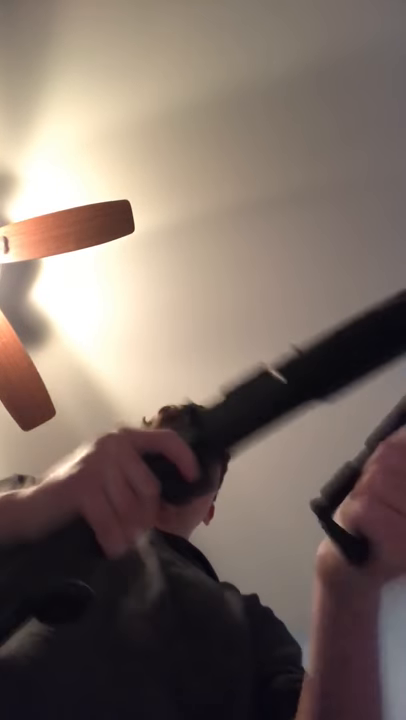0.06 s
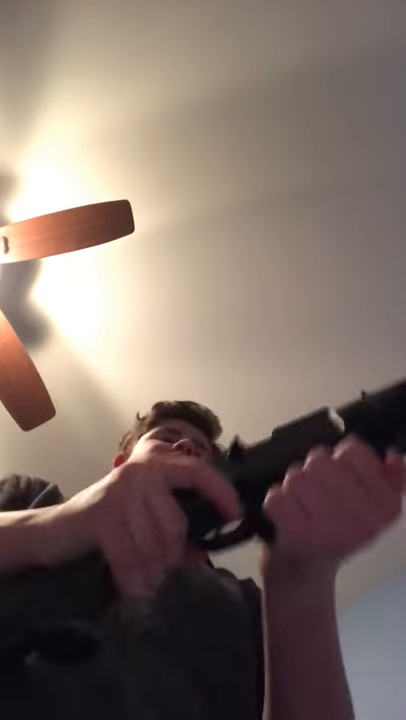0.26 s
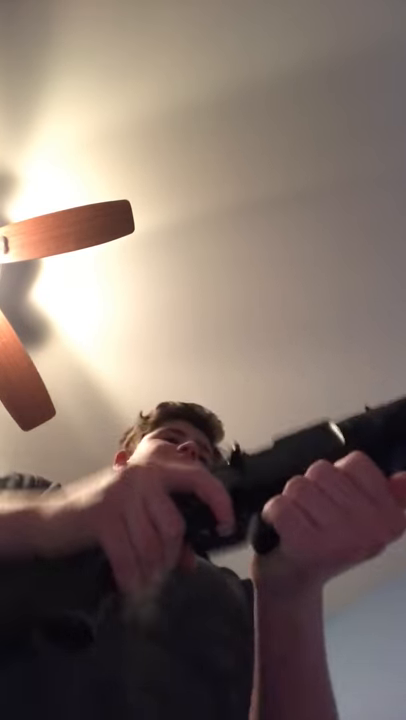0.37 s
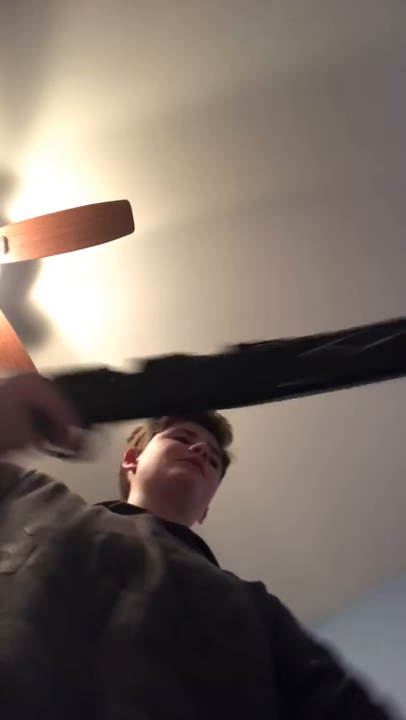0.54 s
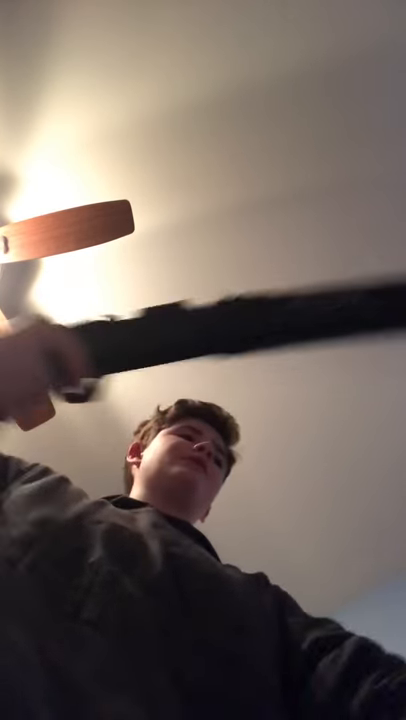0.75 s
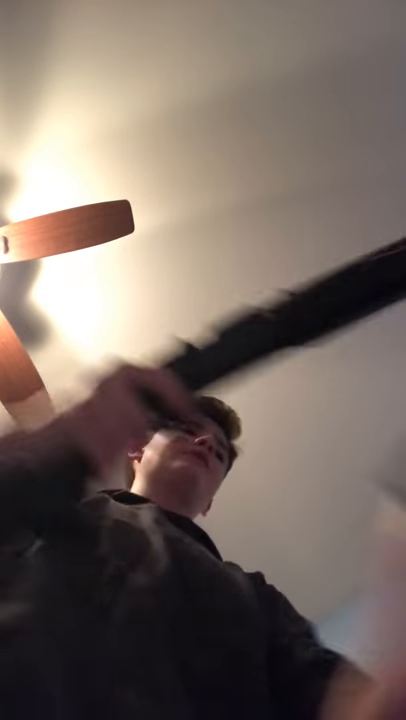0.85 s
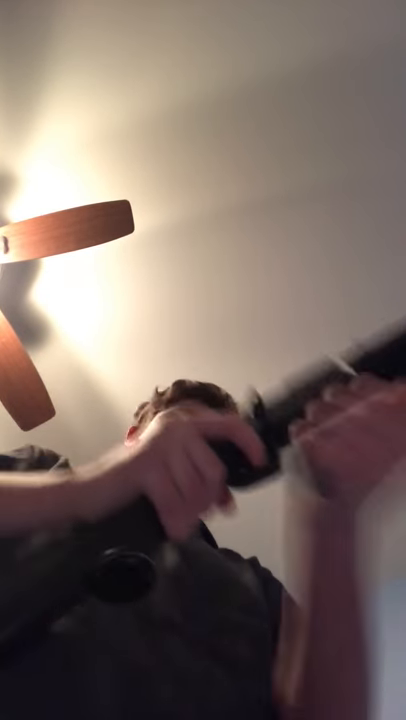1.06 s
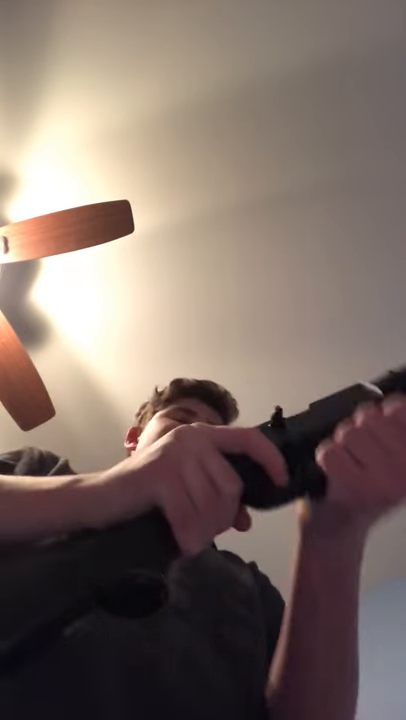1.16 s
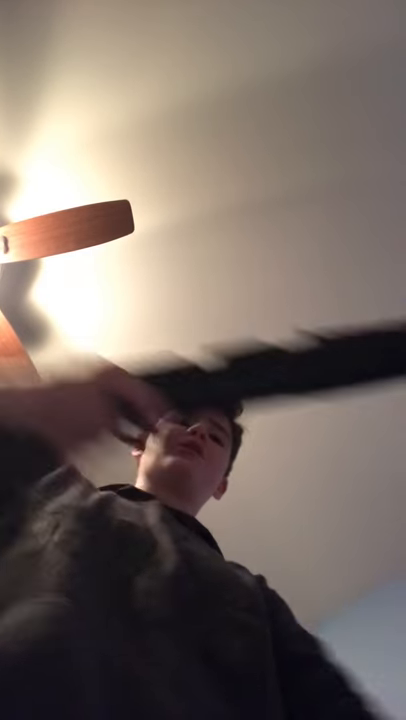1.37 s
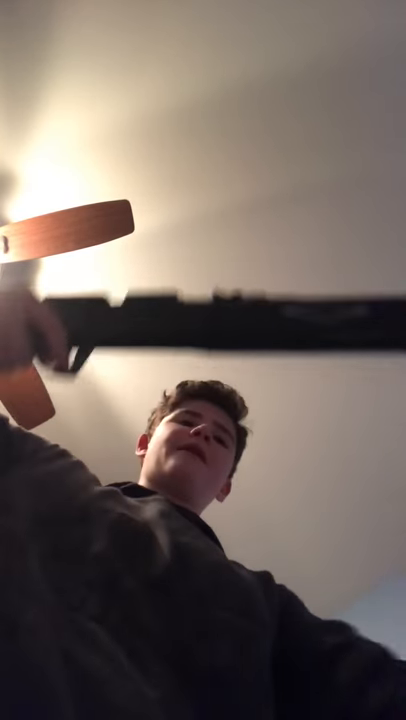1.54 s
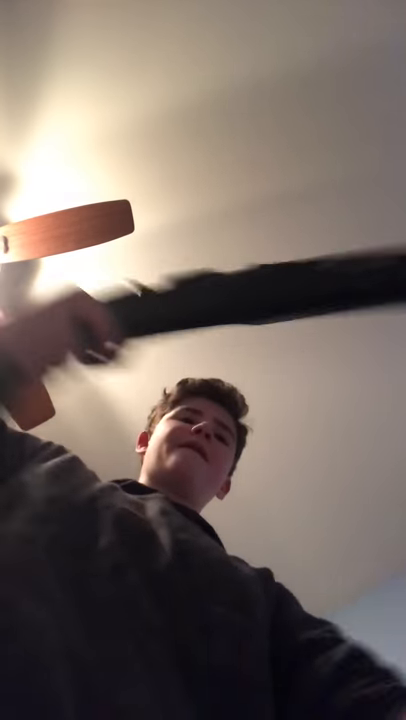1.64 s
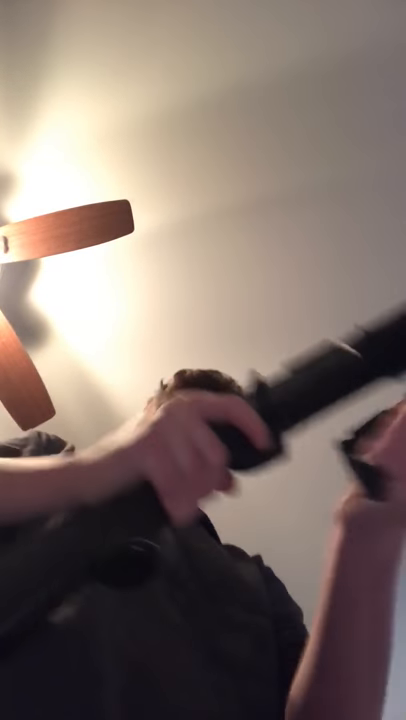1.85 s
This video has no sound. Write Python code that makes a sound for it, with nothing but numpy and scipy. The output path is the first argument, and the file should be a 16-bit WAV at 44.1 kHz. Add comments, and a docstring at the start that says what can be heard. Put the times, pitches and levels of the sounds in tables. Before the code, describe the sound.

A pump air rifle's lever slams shut with a sharp, hollow clack, then swings open with lighter clicks and rattles. The cycle happens twice, with faint piston rubbing between, close to the microphone in a small room.

```python
"""A piston rubs softly over a faint hum, then the lever of a pump air rifle slams shut: a latch crack,
a hollow thunk of the stock, a ring of the barrel. The lever unlatches, knocks over its pivot and hits
its open stop, with small rattles after; the piston rubs and squeaks as it travels. The rifle is worked
twice in a small room, close above the microphone."""
import sys
import numpy as np
from scipy import signal
from scipy.fft import rfft, irfft, next_fast_len
from scipy.io import wavfile
from scipy.ndimage import uniform_filter1d

SR = 44100
rng = np.random.default_rng(int(sys.argv[2]) if len(sys.argv) > 2 else 0)


def unload_audio(sound):
    """Save the sound as a 16-bit wav file, at the path given as the first command line argument."""
    columns = np.transpose(np.atleast_2d(sound))
    # keep every value between -1 and 1, then stretch to whole-number steps
    steps = np.round(np.clip(columns, -1, 1) * 32767)
    wavfile.write(sys.argv[1], SR, steps.astype(np.int16))


N = 83790
T = np.arange(N) / SR
SHORT = T[:N // 4]  # time axis of one impact


def amp(db):
    """Decibels to gain."""
    return 10 ** (np.asarray(db) / 20)


def fade(t, t60):
    """Falls by 60 dB in t60 seconds."""
    return np.exp(-np.log(1000) * t / np.maximum(t60, 1e-3))


def add(out, start_s, sound):
    """Mixes a sound into out."""
    i = int(np.clip(start_s * SR, 0, N - 1))
    out[i:i + len(sound)] += sound[:N - i]


def log_interp(points, hz):
    """Reads a table on a log-frequency axis."""
    point_hz, values = np.array(points).T
    return np.interp(np.log(np.maximum(hz, 1)), np.log(point_hz), values)


def colour(x, spectrum):
    """Minimum-phase filter of the given spectrum; keeps the power of white noise."""
    n = 2 * next_fast_len(len(x))
    gain = amp(log_interp(spectrum, np.arange(n // 2 + 1) * SR / n))
    cepstrum = irfft(np.log(gain / np.sqrt(np.mean(gain ** 2))), n)
    cepstrum[1:n // 2] *= 2
    cepstrum[n // 2 + 1:] = 0
    return irfft(rfft(x, n) * np.exp(rfft(cepstrum)), n)[:len(x)]


def resonate(x, hz, q):
    """One resonance, unity gain at its peak."""
    return signal.lfilter(*signal.iirpeak(hz, q, fs=SR), x)


def grains(spread_db, size=32):
    """Noise of tiny uneven contacts, size samples each; rms 1."""
    strength = np.clip(rng.standard_normal(N // size + 1), -2, 2)
    gain = amp(spread_db * np.repeat(strength, size)[:N])
    return rng.standard_normal(N) * gain / np.sqrt(np.mean(gain ** 2))


def burst(decay_s, flat):
    """A dying cluster of micro-impacts; flat (0-1) evens out its chance resonances."""
    envelope = fade(SHORT, decay_s)
    spectrum = rfft(rng.standard_normal(len(SHORT)) * envelope, 2 * next_fast_len(len(SHORT)))
    flattened = irfft(spectrum / (np.abs(spectrum) + 1e-9) ** flat)[:len(SHORT)]
    cluster = flattened * np.sqrt(envelope)
    return cluster * np.sqrt(np.sum(envelope ** 2) / np.sum(cluster ** 2))


def ring(modes_hz, modes_db, t60s, rise_s):
    """Damped modes that start up to 0.3 ms apart, pushed for about rise_s."""
    out = 0
    for k, (hz, db, t60) in enumerate(zip(modes_hz, modes_db, t60s)):
        lag_s = 0.0003 * rng.random() * min(hz / 5000, 1)
        t = np.maximum(SHORT - lag_s, 0)
        envelope = fade(t, t60) * (1 - np.exp(-t / rise_s))
        out += (-1) ** k * amp(db) * envelope * np.sin(2 * np.pi * hz * t)
    return out


def knock(modes, t60, favoured_hz=None, favour_db=3.5, favour_octaves=0.15):
    """A struck part, detuned anew each blow; the contact point lifts modes near favoured_hz. Peak 1."""
    hz, db = np.array(modes).T
    if favoured_hz is not None:
        db = db + favour_db * np.exp(-(np.log2(hz / favoured_hz) / favour_octaves) ** 2)
    detuned_hz = hz * (1 + 0.02 * rng.standard_normal(len(hz)))
    blow = ring(detuned_hz, db, np.full(len(hz), t60), rise_s=0.00089)
    return blow / np.abs(blow).max()


# Room rumble. Each row: frequency in Hz, relative density in dB.
RUMBLE_SPECTRUM = [(20, -23), (32, -19.5), (55, 0.5), (95, -7), (200, -13.5), (500, -14.5), (1300, -26.5),
                   (4000, -27), (15000, -31)]


def background(rumble_db=-59.5, hum_hz=124.4, hum_db=-65.5):
    """Steady room rumble and a faint mains hum."""
    rumble = amp(rumble_db) * colour(rng.standard_normal(N), RUMBLE_SPECTRUM)
    return rumble + amp(hum_db) * np.sqrt(2) * np.sin(2 * np.pi * hum_hz * T)


# Friction envelope. Each row: time in seconds, level in dB.
RUB_LEVELS = [(0, -56), (.04, -53.5), (.095, -49.5), (0.124, -63.5), (0.147, -50), (.19, -87), (.45, -53.5),
              (.64, -55.5), (.83, -61), (.88, -50.5), (0.905, -44.5), (.95, -53.5), (1.01, -59), (1.1, -77),
              (1.499, -57), (1.73, -59), (1.777, -43.5), (1.81, -55), (1.9, -60)]
# Friction noise. Each row: frequency in Hz, relative density in dB.
RUB_SPECTRUM = [(100, -7.5), (190, -8.5), (310, -1), (550, -4.5), (750, -13), (1100, -1.5), (1500, -2.5),
                (3000, -14), (7000, -23.5), (15000, -36)]
# Pump tube resonances. Each row: frequency in Hz, width in Hz, gain in dB.
TUBE_MODES = [(558, 24, 3.5), (1170, 190, -15), (1430, 70, -5.5)]


def piston():
    """Grainy friction rings the pump tube while the lever travels."""
    times_s, levels_db = np.array(RUB_LEVELS).T
    rub = colour(grains(spread_db=2, size=64), RUB_SPECTRUM) * amp(np.interp(T, times_s, levels_db))
    return rub + sum(amp(db) * resonate(rub, hz, q=hz / width_hz) for hz, width_hz, db in TUBE_MODES)


# Linkage rattles. Each row: start in seconds, relative tick level in dB, knock peak in dB.
RATTLE_HITS = [(0.038, -46, -36), (0.133, -32.5, -40), (0.215, -36.5, -39), (0.231, -21.5, -31),
               (0.4759, -18, -35), (0.506, -39, -35), (0.5294, -20.5, -23.5), (0.534, -29, -50),
               (0.628, -39.5, -35.5), (0.677, -26.5, -36), (0.72, -22, -27), (0.75, -24, -25),
               (0.784, -29.5, -32.5), (0.791, -31, -36), (.903, -32, -47), (.981, -32.5, -48),
               (1.1197, -39.5, -41), (1.132, -43, -32.5), (1.141, -18, -15), (1.3559, -18.5, -41),
               (1.364, -33, -27.5), (1.388, -27.5, -32.5), (1.4067, -27, -22), (1.4148, -23, -30),
               (1.55, -33.5, -61), (1.564, -26.5, -49), (1.6, -21.5, -41), (1.607, -22, -25),
               (1.640, -29, -35), (1.670, -35, -36), (1.676, -29.5, -28.5), (1.819, -35, -48),
               (1.835, -43, -37.5), (1.875, -30, -63)]
# Rattle tick and scrape. Each row: frequency in Hz, relative density in dB.
RATTLE_SPECTRUM = [(150, -13), (700, -7.5), (1400, -10.5), (2400, 2.5), (3200, 1), (4500, -3), (6000, -2.5),
                   (8500, -8), (12000, -14.5), (16000, -30)]
# Loose linkage modes. Each row: frequency in Hz, relative level in dB.
LINKAGE_MODES = [(380, -8), (600, -17), (1090, 2.5), (1280, -1), (1500, -1), (1750, -5.5), (2150, -3.5),
                 (2450, -7.5)]


def rattles(decay_s=0.021, rise_s=0.00042, knock_delay_s=0.0008, scrape_db=-13.5, scrape_s=0.0045):
    """Loose linkage parts tick and knock, scraping as they meet."""
    out, sliding = np.zeros(N), np.zeros(N)
    for start_s, tick_db, knock_db in RATTLE_HITS:
        tick_gain = amp(tick_db - 9)
        contact = burst(decay_s, flat=0.6) * (1 - np.exp(-SHORT / rise_s))
        add(out, start_s, tick_gain * colour(contact, RATTLE_SPECTRUM))
        add(out, start_s + knock_delay_s, amp(knock_db) * knock(LINKAGE_MODES, decay_s))
        sliding += tick_gain * amp(scrape_db) * np.exp(-np.abs(T - start_s) / scrape_s)
    return out + sliding * colour(grains(spread_db=7.5), RATTLE_SPECTRUM)


# Handling bumps. Each row: start in seconds, level in dB, frequency in Hz, t60 in seconds.
HAND_BUMPS = [(0.141, -40, 71, 0.17), (0.243, -43, 55.4, 0.19), (0.976, -51, 56.2, 0.26),
              (1.142, -39, 57.4, 0.3), (1.873, -30, 85, 0.035)]


def hand_bumps():
    """Hands bump the stock softly, one low mode each time."""
    out = np.zeros(N)
    for start_s, db, hz, t60 in HAND_BUMPS:
        add(out, start_s, ring([hz], [db], [t60], rise_s=0.0022))
    return out


# Seal and valve squeaks. Each row: start in seconds, length in seconds, pitch in Hz, level in dB.
SEAL_SQUEAKS = [(0.223, 0.016, 7900, -55), (0.877, 0.07, 568, -47), (.89, 0.052, 1018, -51),
                (1.126, .018, 7950, -53), (1.129, .014, 2500, -41)]


def squeaks(waver_depth=0.016):
    """Friction at the piston seal and valve breaks into brief wavering tones."""
    out = np.zeros(N)
    knots_s = SHORT[::400]
    for start_s, length_s, hz, db in SEAL_SQUEAKS:
        waver = np.interp(SHORT, knots_s, rng.standard_normal(len(knots_s)))
        phase = 2 * np.pi * np.cumsum(hz * (1 + waver_depth * waver)) / SR
        swell = np.sin(np.pi * np.minimum(SHORT / length_s, 1))
        add(out, start_s, amp(db) * np.sqrt(2) * swell * np.sin(phase))
    return out


# Lever closings. Each row: start in seconds, crack trim in dB, latch pitch in Hz,
# thunk delay in seconds, then thunk, ring and clatter trims in dB.
LEVER_SLAMS = [(0.2370, 2, 4220, 0.0045, 0.5, -0.5, 2.5), (1.1431, -1.5, 6660, .0032, 0.5, -13, 1.5)]
# Stock and barrel modes. Each row: frequency in Hz, thunk level in dB, thunk t60 in seconds,
# ring level in dB, ring t60 in seconds.
BODY_MODES = [(822, -22.5, 0.018, -46, 0.13), (915, -10.5, 0.024, -45, 0.19),
              (1145, -17.5, 0.01, -30, 0.065), (1422, -4.5, 0.027, -36.5, 0.12),
              (1656, -10.5, 0.016, -42, .08), (2072, -5, 0.016, -44, .1), (2530, -16.5, 0.02, -48.5, 0.1),
              (2842, -11, 0.02, -41, .12), (3950, -15, 0.023, -41.5, 0.2), (4300, -39, .025, -43.5, 0.31),
              (5330, -29, 0.056, -41, .17)]
# Latch crack, loose-part clatter, dull stock thud. Each row: frequency in Hz, relative density in dB.
CRACK_SPECTRUM = [(150, -17.5), (700, -15), (1400, -3), (2300, -2.5), (3200, -8), (4300, -4), (6500, -3.5),
                  (9000, -7.5), (13000, -9.5), (16000, -11)]
CLATTER_SPECTRUM = [(150, -8), (700, -1.5), (1100, 7.5), (2300, 2), (3200, 2.5), (4500, 6), (7000, -1),
                    (10000, -6), (15000, -14)]
THUD_SPECTRUM = [(110, -29), (180, -16.5), (260, -3), (370, 1.5), (500, -7), (660, -14.5), (1300, -32.5),
                 (4000, -61)]


def slams(thud_delay_s=0.00034, rise_s=0.00033):
    """The latch cracks at its own pitch, the stock thunks, the barrel rings and loose parts clatter."""
    out = np.zeros(N)
    hz, stock_db, stock_t60, barrel_db, barrel_t60 = np.array(BODY_MODES).T
    thud = colour(signal.unit_impulse(len(SHORT)), THUD_SPECTRUM)
    for start_s, crack_db, latch_hz, delay_s, thunk_db, ring_db, clatter_db in LEVER_SLAMS:
        crack = colour(burst(decay_s=0.028, flat=0.94), CRACK_SPECTRUM)
        latch = amp(5.5) * resonate(crack, latch_hz, q=8.7)
        clatter = colour(grains(spread_db=4) * fade(T, t60=0.18), CLATTER_SPECTRUM)
        thunk = ring(hz, stock_db + thunk_db, stock_t60, rise_s)
        barrel = ring(hz, barrel_db + ring_db, barrel_t60, rise_s)
        add(out, start_s, amp(crack_db - 9.5) * (crack + latch))
        add(out, start_s + delay_s, thunk + barrel)
        add(out, start_s + delay_s, amp(clatter_db - 19.5) * clatter)
        add(out, start_s + delay_s + thud_delay_s, amp(thunk_db + 2.5) * thud)
    return out


# Lever contacts. Each row: start in seconds, part struck, relative tick level in dB,
# knock delay in seconds, knock peak in dB, knock t60 in seconds, favoured frequency in Hz.
LEVER_HITS = [(0.4801, "catch", -14.5, -0.0039, -10.5, .015, 1140),
              (0.5379, "pivot", -10, 0.00099, -11, 0.018, 1420),
              (0.6815, "stop", -9, .0004, -15, 0.012, 2380),
              (0.6841, "stop", -26, .0002, -12.5, 0.014, 1460),
              (0.7451, "catch", -19.5, 0.0002, -25.5, 0.015, 1350),
              (1.3578, "catch", -14, -0.003, -10.5, 0.013, 1660),
              (1.4181, "pivot", -11.5, .0006, -13, 0.014, 2070),
              (1.5683, "stop", -7.5, 0.0014, -9.5, 0.022, 1330)]
# Modes of catch, pivot and stop. Each row: frequency in Hz, relative level in dB.
PART_MODES = {"catch": [(370, -13), (1110, -2.5), (1350, -4.5), (1560, 2), (1760, -3), (2150, -7),
              (4550, -9), (5900, -10.5)], "pivot": [(590, -14), (1070, 3.5), (1400, 2), (2100, 0.5),
              (2560, -1), (3500, -29), (5350, -6), (8500, -14)], "stop": [(520, -13), (1090, -6),
              (1335, 4.5), (1490, -1), (2000, -3), (2380, -2), (2780, -8), (3420, -24), (4400, -15),
              (5450, -21)]}
# Tick of each part. Each row: frequency in Hz, relative density in dB.
TICK_SPECTRA = {"catch": [(150, -4), (700, -9.5), (1500, -5), (3000, -4), (4800, 0), (8500, -7),
                (12000, -8), (16000, -9)], "pivot": [(150, -16.5), (700, -13), (1400, 3.5), (2300, 3.5),
                (3300, -1.5), (4200, -1.5), (6000, -1), (9000, -7.5), (11500, -2.5), (15500, -21)],
                "stop": [(150, -15.5), (700, -14.5), (1350, 6.5), (1800, -2.5), (2350, 2), (3100, -3.5),
                (4450, 0), (6500, -6.5), (9000, -8), (16000, -18)]}


def lever_knocks(upper_hz=2250, width_hz=300):
    """The lever hits catch, pivot and stop: a knock, and a metal tick hollowed by the upper modes."""
    out = np.zeros(N)
    for start_s, part, tick_db, delay_s, knock_db, t60, favoured_hz in LEVER_HITS:
        modes = PART_MODES[part]
        tick = colour(burst(decay_s=0.021, flat=0.46), TICK_SPECTRA[part])
        hollow = sum(resonate(tick, hz, q=hz / width_hz) for hz, _ in modes if hz > upper_hz)
        add(out, start_s, amp(tick_db - 9.5) * (tick + amp(-2) * hollow))
        add(out, start_s + delay_s, amp(knock_db) * knock(modes, t60, favoured_hz))
    return out


def flatten(response, bins):
    """Evens out the broad peaks of a response, leaving its fine ripple; energy 1."""
    spectrum = rfft(response, 2 * len(response))
    smooth_power = uniform_filter1d(np.abs(spectrum) ** 2, bins)
    flat = irfft(spectrum / np.sqrt(smooth_power + 1e-12))[:len(response)]
    return flat / np.linalg.norm(flat)


# Room decay. Each row: frequency in Hz, t60 in seconds.
ROOM_DECAY = [(150, 0.14), (500, 0.31), (1500, 0.35), (4500, 0.51), (9000, 0.24), (15000, 0.099)]
# Tone of the reflections. Each row: frequency in Hz, relative gain in dB.
ROOM_SPECTRUM = [(100, -11.5), (350, -3.5), (700, 3), (1300, 0.5), (2500, -0.5), (5000, -2.5), (8000, -0.5),
                 (11000, -1.5), (15000, 1)]


def room(x, delay_s=0.004, early_t60_s=0.11, early_db=-9, tail_db=-16):
    """Early reflections and a diffuse tail whose top treble dies first."""
    t = T[:N // 2]
    noise_spectrum = rfft(rng.standard_normal(len(t)))
    hz = np.arange(len(noise_spectrum)) * SR / len(t)
    tail = 0
    for band_hz, t60 in ROOM_DECAY:
        band = log_interp([(f, f == band_hz) for f, _ in ROOM_DECAY], hz)
        tail += irfft(noise_spectrum * band, len(t)) * fade(t, t60)
    early_fade = fade(t, early_t60_s)
    early = flatten(rng.standard_normal(len(t)) * early_fade, bins=71)
    tail = flatten(tail * (1 - early_fade), bins=45)
    response = np.zeros(N)
    add(response, delay_s, amp(early_db) * early + amp(tail_db) * tail)
    return signal.fftconvolve(x, colour(response, ROOM_SPECTRUM))[:N]


def moving_room(x, places=4):
    """The rifle is swung about, so each place it passes has its own reflections."""
    position = T / T[-1] * (places - 1)
    crossfades = [np.cos(np.pi / 2 * np.minimum(np.abs(position - k), 1)) for k in range(places)]
    return sum(room(x * crossfade) for crossfade in crossfades)


def scene(beam_hz=8800):
    """The rifle near the microphone, and the room around it."""
    shut = slams()
    small_sounds = lever_knocks() + rattles() + piston() + squeaks()
    # Above beam_hz the small sounds hardly reach the walls.
    to_walls = signal.sosfilt(signal.butter(2, beam_hz, fs=SR, output="sos"), small_sounds)
    reflections = moving_room(amp(2) * shut + to_walls)
    return (shut + small_sounds + reflections + background() + hand_bumps())[None]


def record(dry):
    """The microphone port dents the treble; the loudest peaks clip and the top is cut."""
    notch_hz, notch_depth, top_hz = 10480, 0.68, 16000
    notched = signal.lfilter(*signal.iirnotch(notch_hz, Q=16, fs=SR), dry)
    clipped = np.clip(dry + notch_depth * (notched - dry), -1, 1)
    return signal.sosfilt(signal.ellip(10, 0.2, 70, top_hz, fs=SR, output="sos"), clipped)


dry = scene()
out = record(dry)
unload_audio(out)
```